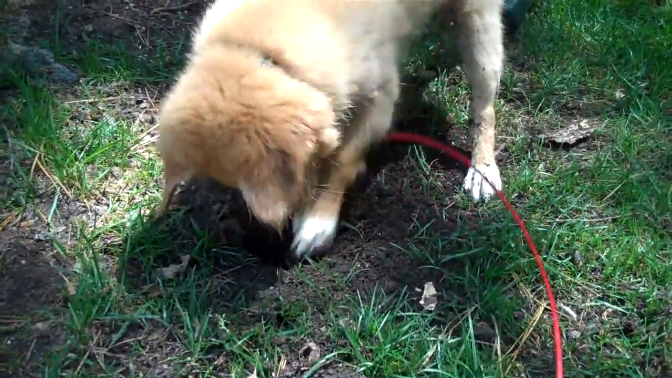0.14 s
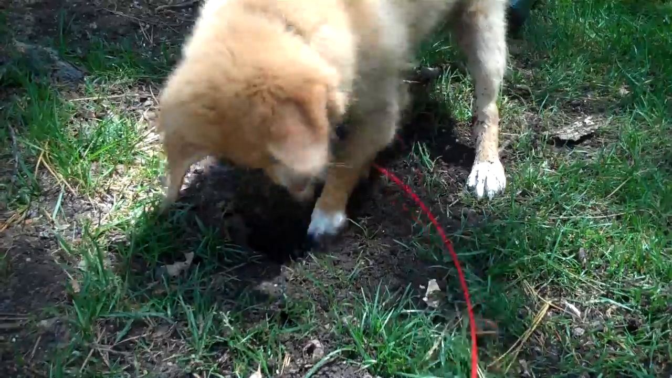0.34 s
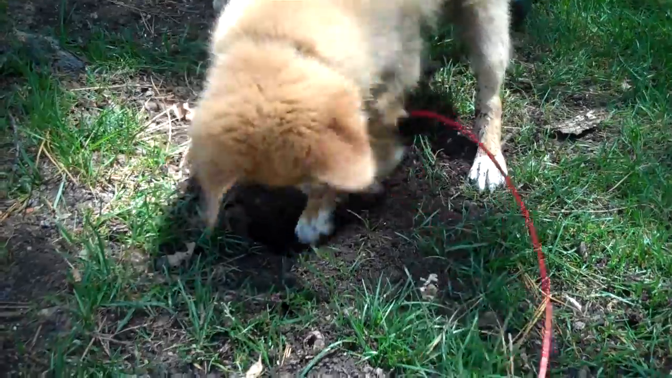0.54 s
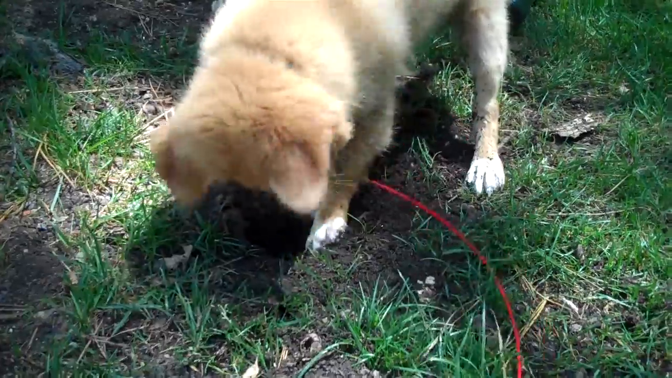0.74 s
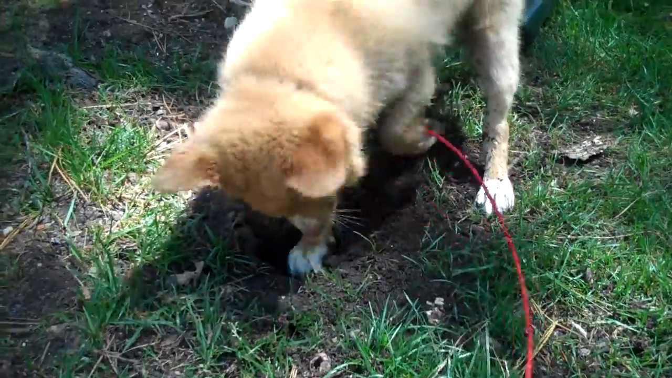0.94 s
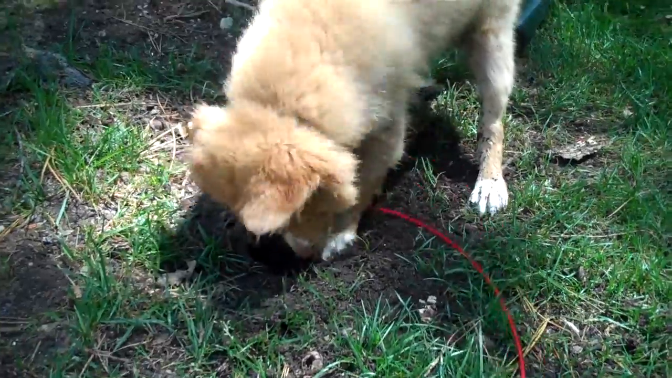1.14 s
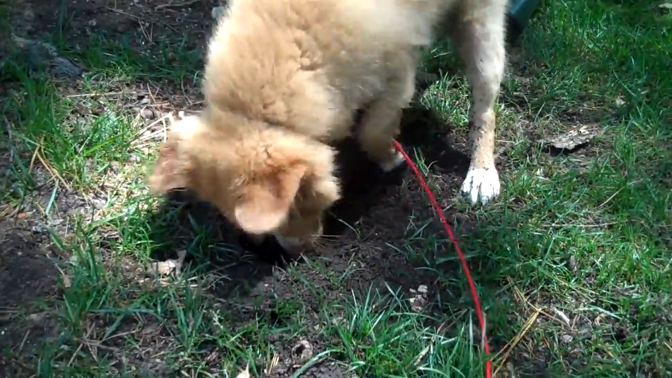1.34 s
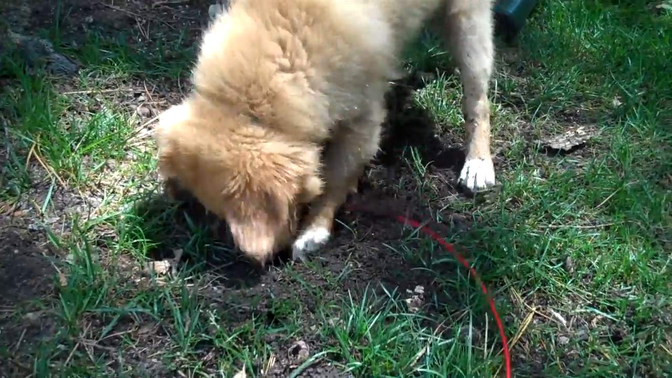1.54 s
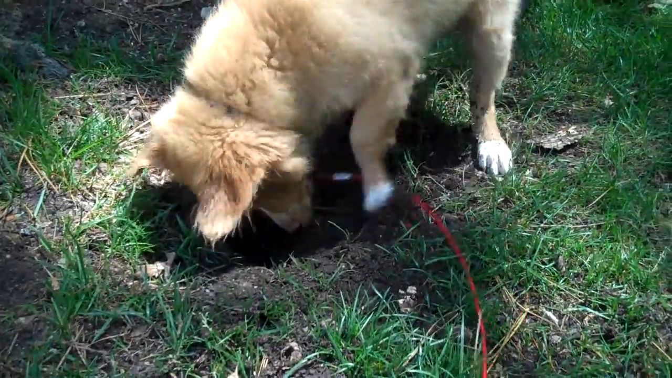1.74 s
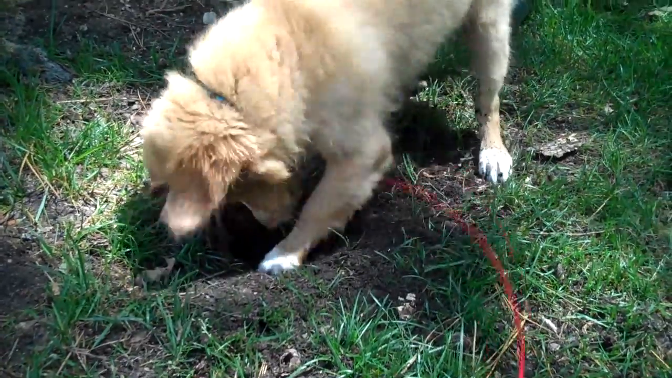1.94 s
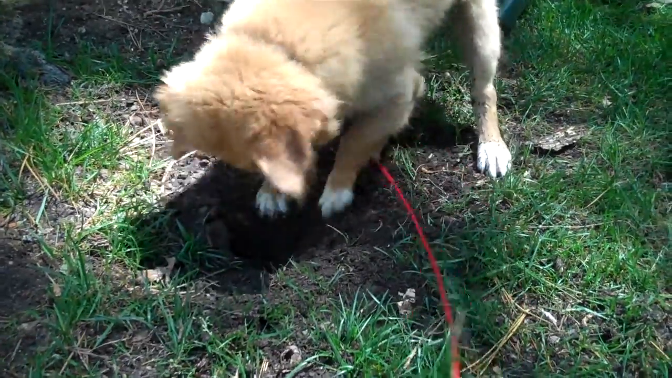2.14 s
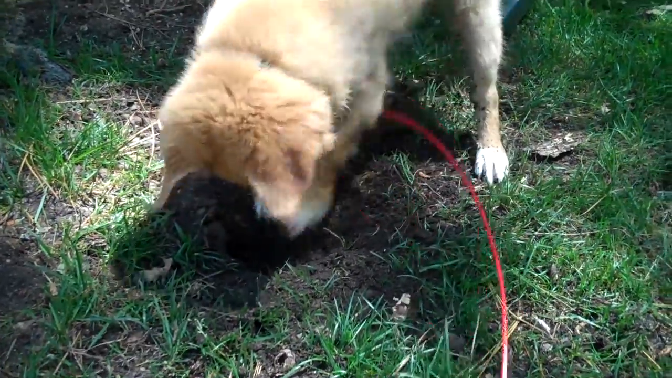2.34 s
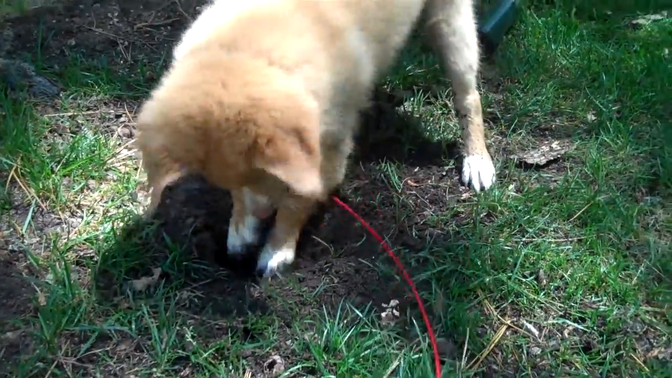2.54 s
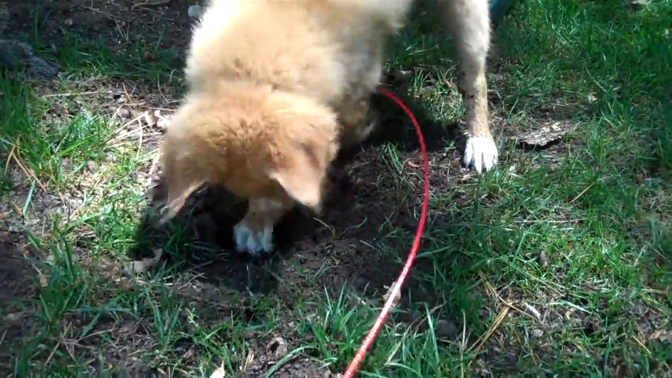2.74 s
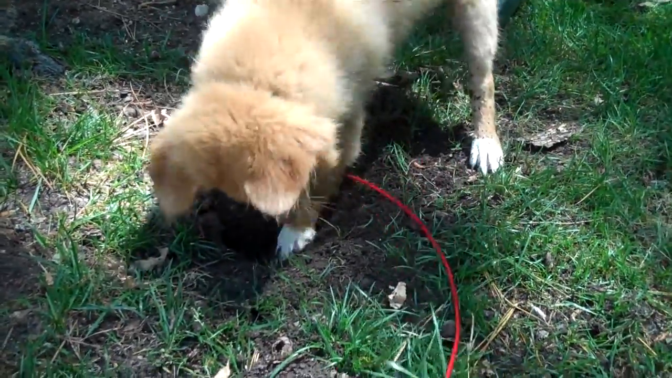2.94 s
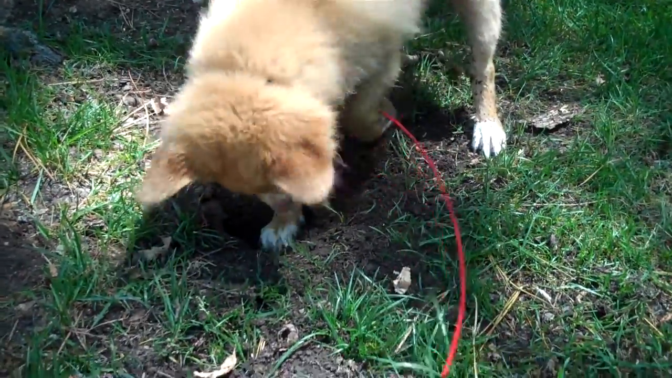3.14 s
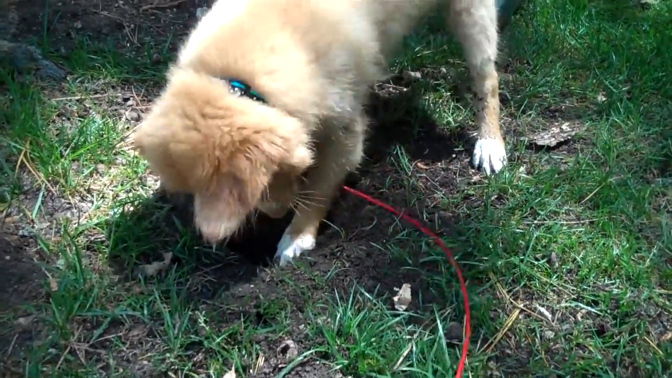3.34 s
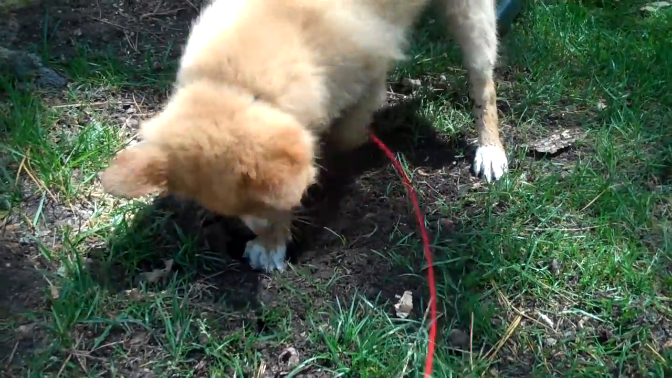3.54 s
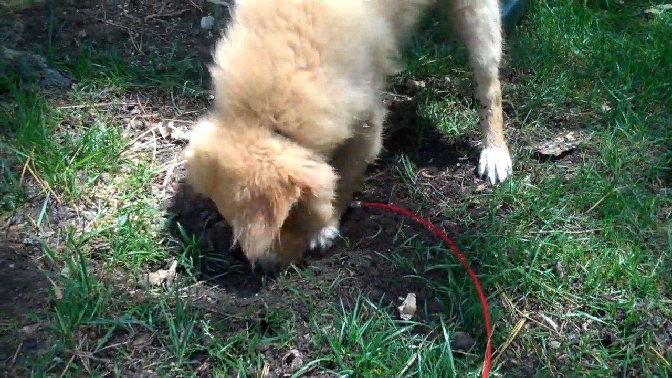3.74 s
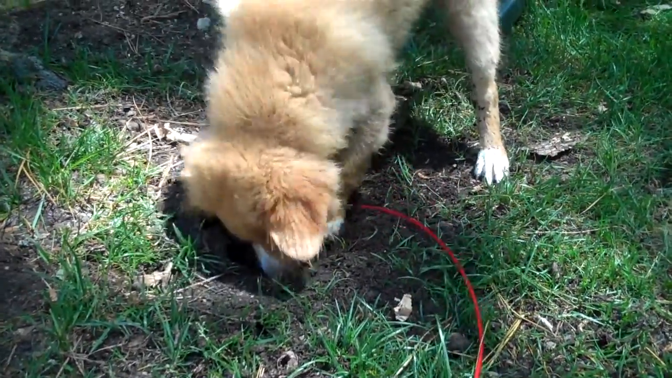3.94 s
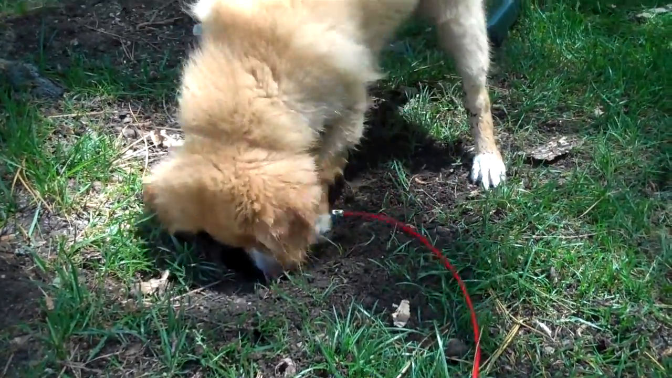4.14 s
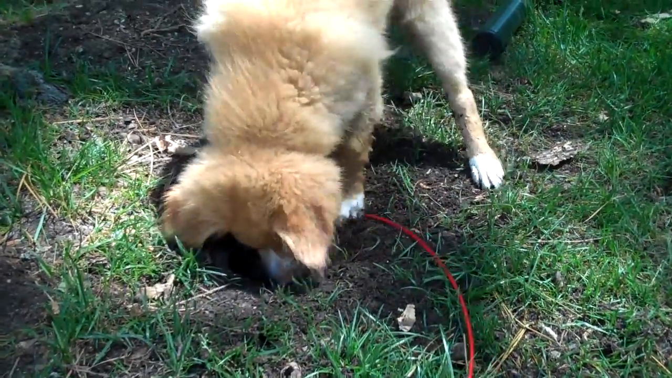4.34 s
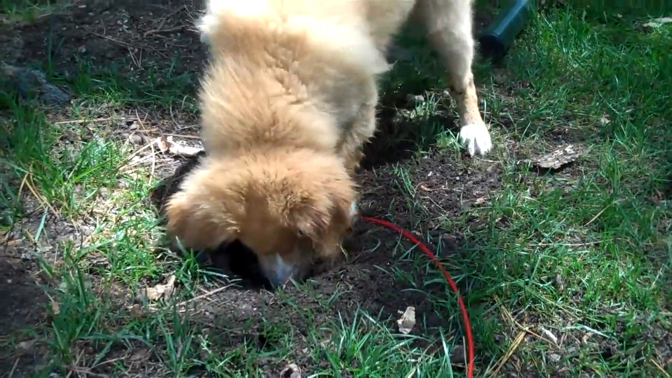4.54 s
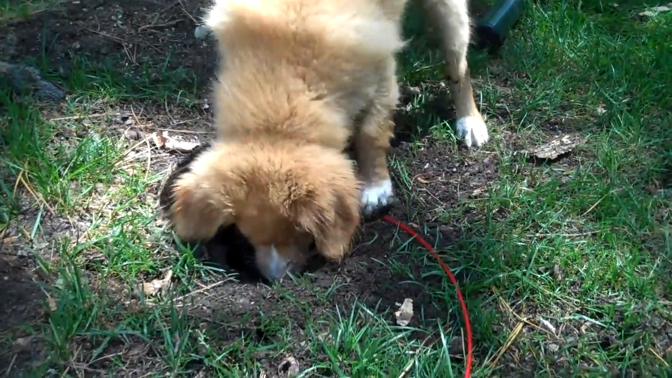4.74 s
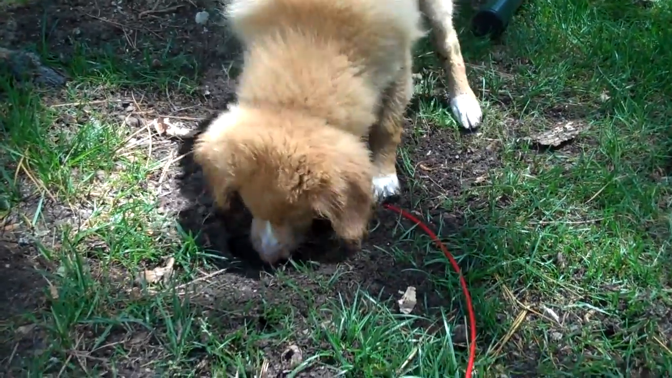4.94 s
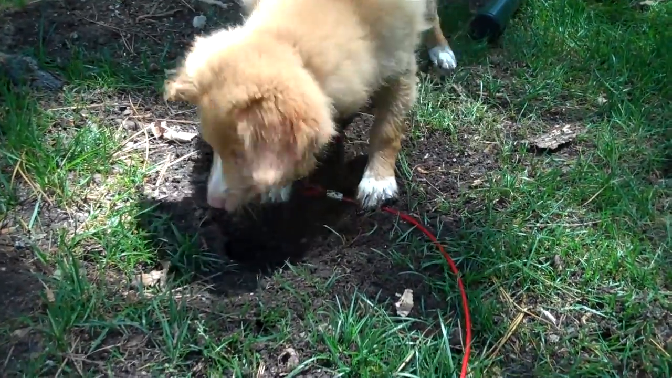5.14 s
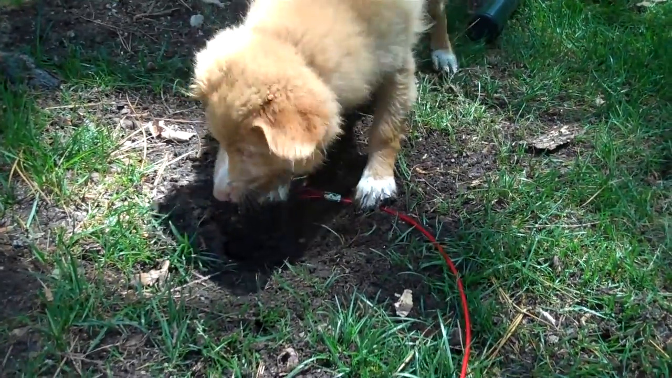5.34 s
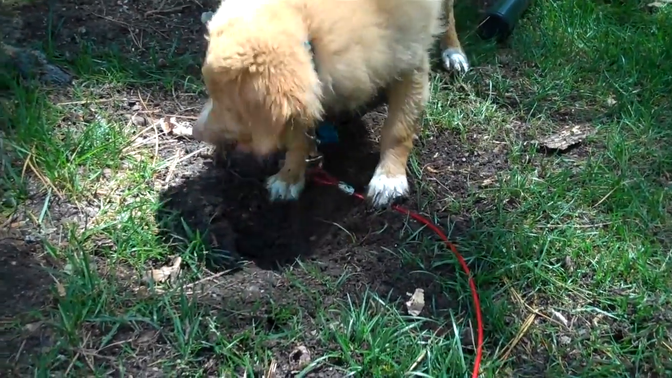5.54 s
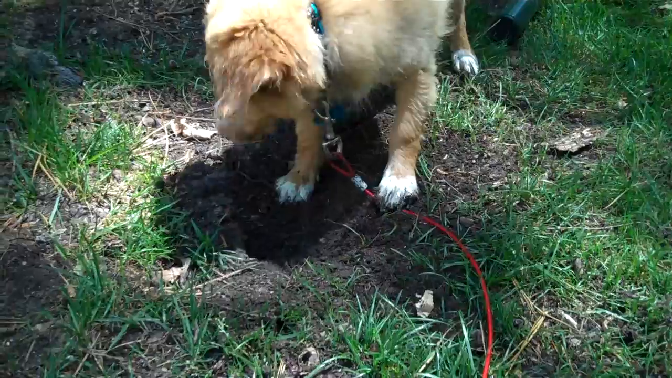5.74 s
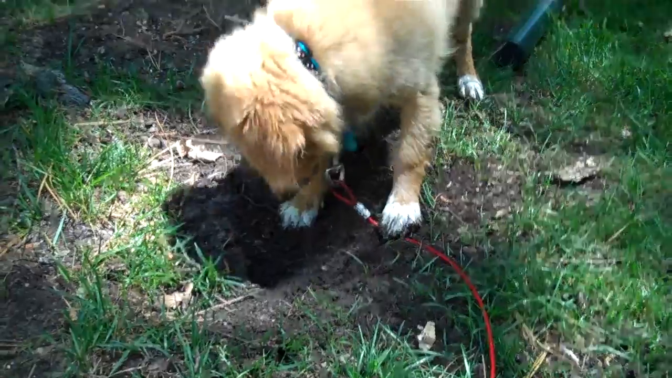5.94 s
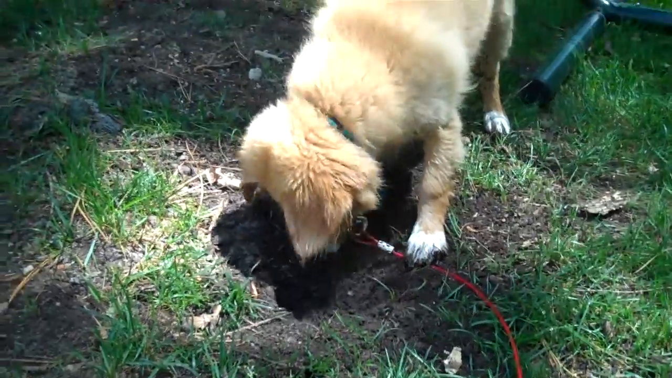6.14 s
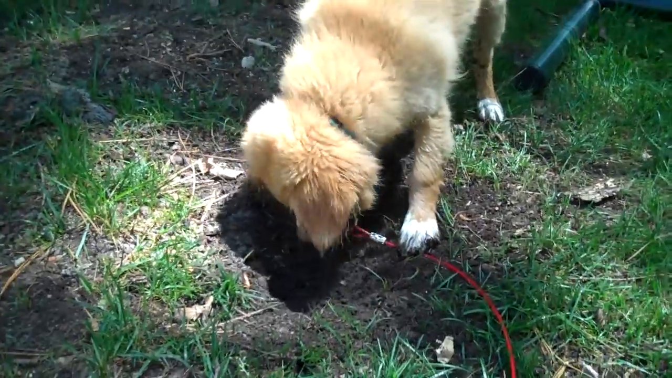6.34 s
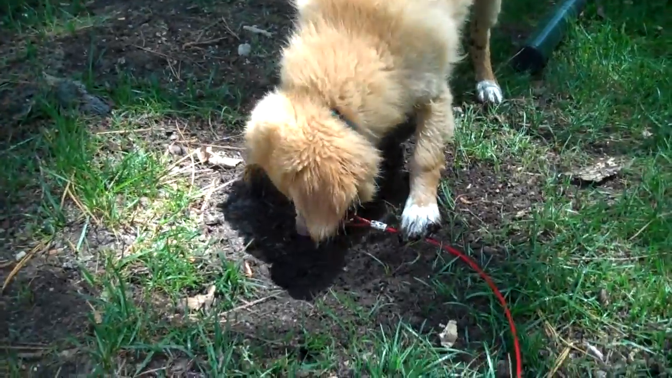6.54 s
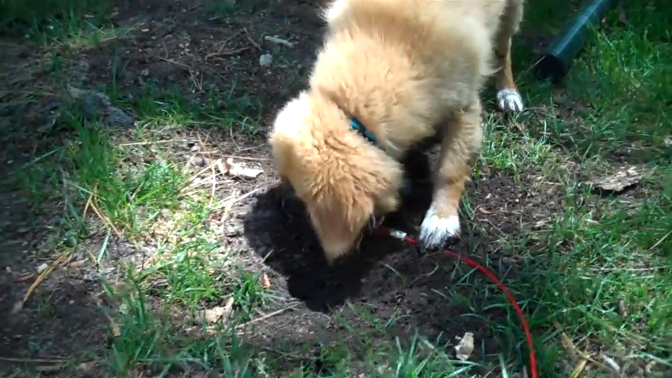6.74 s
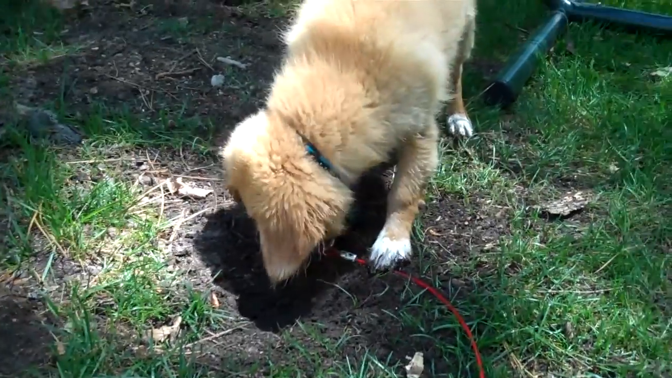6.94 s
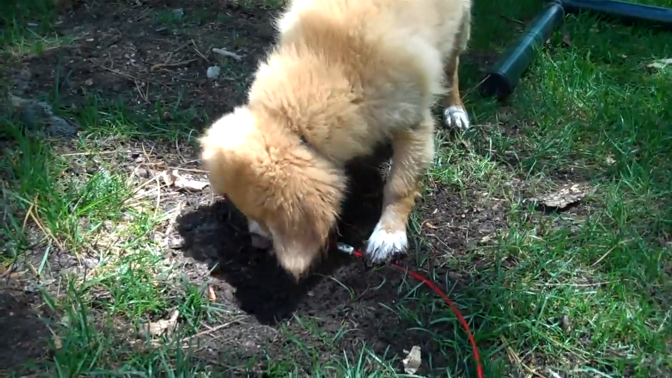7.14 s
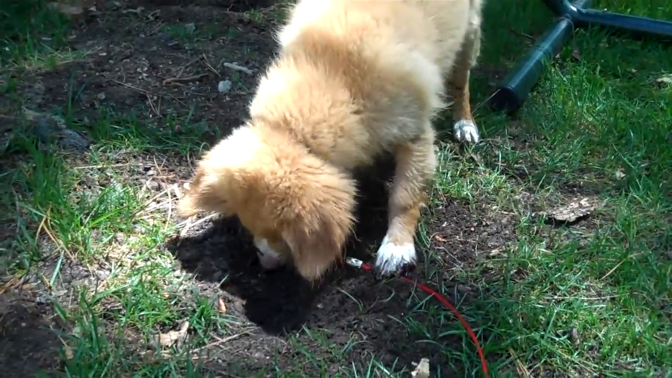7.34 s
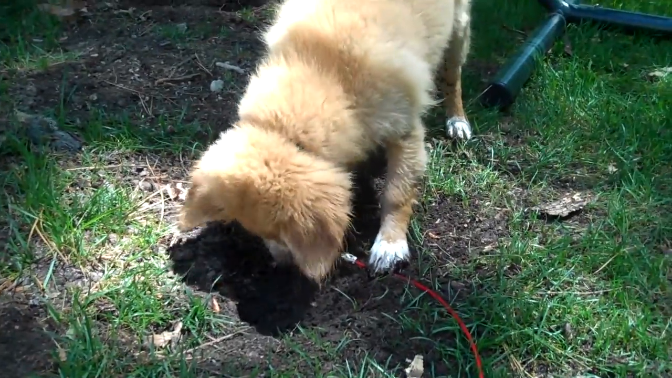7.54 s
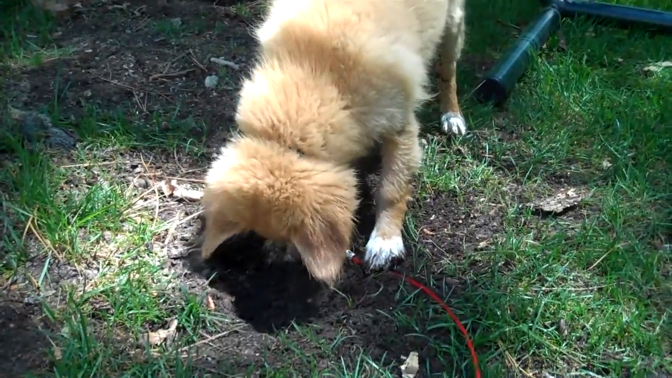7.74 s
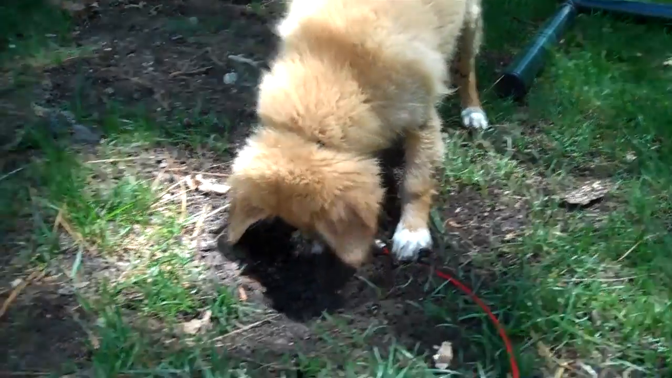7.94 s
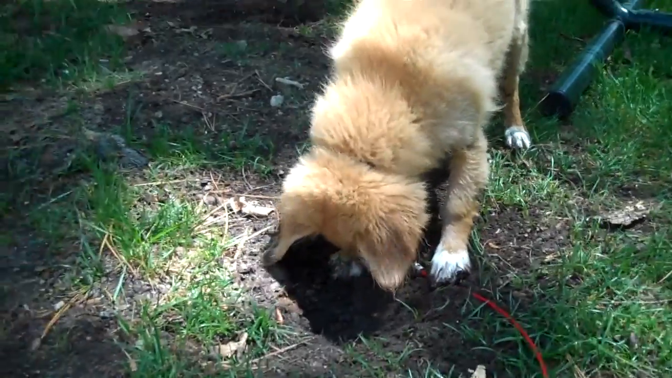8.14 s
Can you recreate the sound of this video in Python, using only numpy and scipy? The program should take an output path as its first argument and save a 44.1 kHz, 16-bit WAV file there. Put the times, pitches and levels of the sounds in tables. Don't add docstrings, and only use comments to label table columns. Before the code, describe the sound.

Outdoors in a yard, a small camera about a metre away hears a puppy digging busily: sharp claw clicks, root snaps, crumbling clods and bursts of sprayed dry earth, with collar tags clinking brightly. After four seconds the digging thins, a brief nose puff comes, a few more scratches follow, then mostly quiet town wash, low hum and a thin insect buzz.

```python
import sys
import numpy as np
from scipy import signal
from scipy.fft import rfft, irfft, next_fast_len
from scipy.io import wavfile
from scipy.ndimage import uniform_filter1d

SR = 44100
rng = np.random.default_rng(int(sys.argv[2]) if len(sys.argv) > 2 else 0)


def boost_factor(decibels):
    exponent = np.asarray(decibels, float) / 20
    return 10 ** exponent


def unload_audio(sound):
    columns = np.transpose(np.atleast_2d(sound))
    steps = np.round(np.clip(columns, -1, 1) * 32767)
    wavfile.write(sys.argv[1], SR, steps.astype(np.int16))


N = 365588
T = np.arange(N) / SR
OPPOSITE = np.array([[1], [-1]])


def level(x, rms_db):
    return x * boost_factor(rms_db) / np.sqrt(np.mean(x ** 2))


def peak(x, hz, width_hz):
    return signal.lfilter(*signal.iirpeak(hz, hz / width_hz, SR), x)


def band(x, lo_hz, hi_hz):
    return signal.sosfilt(signal.butter(2, [lo_hz, hi_hz], "band", fs=SR, output="sos"), x)


def low(x, hz, order):
    return signal.sosfilt(signal.butter(order, hz, fs=SR, output="sos"), x)


def sides(pan_db):
    gains = boost_factor(np.array([pan_db, -pan_db]) / 2)
    return 2 * gains / gains.sum(axis=0)


def quieter_right(pan_db):
    return boost_factor(np.array([[0], [-pan_db]]))


def late_left(x, samples):
    return np.array([np.roll(x[0], samples), x[1]])


def walk(rate_hz):
    hold = int(SR / rate_hz)
    steps = np.repeat(rng.standard_normal(N // hold + 1), hold)
    return 1.35 * uniform_filter1d(uniform_filter1d(steps, hold), hold)[:N]


def curve(tables, column, rest):
    out = np.full(N, float(rest))
    for rows in map(np.array, tables):
        inside = (T >= rows[0, 0]) & (T <= rows[-1, 0])
        out[inside] = np.interp(T[inside], rows[:, 0], rows[:, column])
    return out


def add(out, start_s, sound):
    i = int(start_s * SR)
    out[..., i:i + sound.shape[-1]] += sound[..., :N - i]


def narrow(hz, width_hz, steady):
    wobble = walk(width_hz) + 1j * walk(width_hz) + steady
    return np.real(wobble * np.exp(2j * np.pi * np.cumsum(hz + 0 * T) / SR))


# pitch_hz, width_hz, level_db
LEFT_PORT = [(7600, 1050, 1.6), (5200, 3600, -11)]
RIGHT_PORT = [(6330, 850, 3.0), (4400, 3000, -12)]


def ports(x):
    rung = []
    for heard, modes in zip(x, (LEFT_PORT, RIGHT_PORT)):
        rung.append(sum(boost_factor(db) * peak(heard, hz, width_hz) for hz, width_hz, db in modes))
    return band(np.array(rung), 2600, 9100)


# start_s, peak_db, left_minus_right_db
GRIT_TICKS = [(.0635, -14, 0), (.0667, -20, 3), (.1333, -29, -3), (.2035, -30, 0), (.2125, -34, -3),
              (.3674, -25, 9), (.5585, -16, -6), (.7255, -26, 2), (1.2275, -23, -3), (1.2979, -17, 3),
              (1.8393, -24, -4), (2.0842, -13, -4), (2.2471, -16, -1), (2.347, -19, 0), (3.0447, -19, 3),
              (3.0522, -9, 1), (3.1625, -21, -1), (3.612, -21, 0), (3.6551, -12, -3), (3.9098, -18, 9),
              (3.9196, -20, -1), (5.7079, -20, -1), (2.1635, -23, 0), (4.4235, -36, -4), (4.478, -36, 0),
              (6.992, -47, 5), (7.187, -46, 0)]
GRIT_CRACKS = [(.1277, -27, -5), (.9462, -22, -3), (1.3061, -22, 0), (1.3162, -16, -5), (1.4062, -14, -3),
               (1.4667, -28, -5), (1.4799, -24, 1), (1.857, -26, -1), (1.9657, -15, -6), (2.0376, -16, -4),
               (2.0712, -26, -9), (2.1744, -18, 0), (2.8453, -23, -1), (3.0077, -28, -3), (3.0359, -21, 4),
               (3.1591, -27, -3), (3.2117, -19, -3), (3.4208, -22, 1), (3.4606, -8, -3), (3.9332, -26, 0),
               (3.9378, -20, 5), (4.1341, -26, -1), (5.3366, -24, 6), (5.5086, -23, 8), (5.6803, -32, 8),
               (7.5143, -37, 5)]
CLOD_BREAKS = [(.3976, -30, -3), (.8254, -19, -1), (.9138, -29, 1), (1.0139, -22, -1), (1.6553, -33, -11),
               (1.7172, -27, -2), (1.7377, -29, 0), (1.9135, -24, 0), (2.2021, -29, 2), (2.2318, -22, -5),
               (2.6379, -23, -5), (2.6651, -28, -2), (2.7225, -21, 0), (2.7697, -20, 4), (3.2217, -21, 1),
               (3.6233, -20, 4), (3.6503, -22, -5), (3.8708, -29, 2), (4.1664, -30, -3), (4.5225, -33, -1),
               (5.5273, -19, 6), (5.6762, -27, 0), (5.7196, -27, -6), (5.7582, -38, -4), (5.9365, -33, 2),
               (7.1627, -39, 4)]
ROOT_TEARS = [(.2974, -20, 6), (.5146, -21, 5), (.5476, -16, 3), (.8354, -17, 3), (.8618, -9, -6),
              (1.1609, -19, -7), (1.3747, -23, -4), (1.4175, -15, 4), (2.318, -24, 0), (2.5851, -20, -7),
              (2.7266, -12, -4), (2.9781, -27, 0), (3.2898, -35, 1), (3.3993, -19, -7), (3.6161, -22, 1),
              (3.8268, -31, -4), (3.8429, -30, -5), (4.1936, -30, -5), (4.2684, -26, 3), (4.3242, -35, -3),
              (4.4452, -37, -4), (4.647, -40, -1), (4.7085, -32, 1), (4.7503, -35, 0), (5.113, -29, -5),
              (5.3709, -34, -4), (6.2623, -38, -6), (7.3272, -44, -3), (7.6608, -39, -6), (7.965, -45, -7)]


def snaps():
    body, dull = np.zeros((2, 2, N))
    t = np.arange(900) / SR
    crumbling = np.exp(-t / .0008) + .12 * np.exp(-t / .007)
    kinds = (GRIT_TICKS, -29), (GRIT_CRACKS, -23), (CLOD_BREAKS, -17), (ROOT_TEARS, -11)
    for rows, dull_db in kinds:
        for start_s, peak_db, pan_db in rows:
            mid, side = rng.standard_normal((2, len(t)))
            burst = .34 * (mid + .46 * side * OPPOSITE) * crumbling
            burst[:, 0] += 1
            burst = burst * boost_factor(peak_db)
            add(body, start_s, burst * sides(pan_db)[:, None])
            add(dull, start_s, burst * boost_factor(dull_db))
    ringing = band(ports(body), 3900, 15000)
    dull = band(dull, 1900, 5200)
    sharp = low(band(body, 9300, 15000), 14300, order=12) * sides(10.5)[:, None]
    return boost_factor(18.5) * ringing + boost_factor(21) * dull + boost_factor(-8) * sharp


# fullest_s, level_db, swell_over_18db_s, fall_by_18db_s
PAW_STROKES = [(.073, -37, .15, .12), (.33, -46, .16, .4), (.556, -36, .19, .06), (.869, -43, .3, .075),
               (.967, -38, .06, .12), (1.161, -45, .13, .6), (1.307, -35, .087, .045),
               (1.426, -38, .1, .14), (1.731, -48, .1, .4), (1.923, -38, .13, .3), (2.087, -44, .2, .12),
               (2.167, -41, .08, .06), (2.24, -39, .06, .12), (2.346, -43, .6, .16), (2.598, -37, .07, .11),
               (2.758, -38, .09, .08), (2.949, -45, .3, .4), (3.053, -38, .06, .08),
               (3.225, -36, .12, .035), (3.455, -36, .14, .05), (3.645, -41, .21, .05),
               (3.928, -43, .195, .06), (4.185, -52, .25, .09), (4.441, -56, .32, 1.1),
               (4.858, -50, .06, .16), (5.175, -41, .1, .12), (5.523, -47, .045, .035),
               (5.671, -56, .2, .3), (5.94, -55, .07, .07)]
# start_s, level_db
SETTLING = [
    (0, -58),
    (3.9, -59),
    (4.1, -66),
    (5.4, -62),
    (6.0, -80),
    (8.29, -80),
]


def digging():
    out = curve([SETTLING], 1, -120)
    for full_s, db, swell_s, fall_s in PAW_STROKES:
        before = (full_s - T) / max(swell_s, .01)
        after = (T - full_s) / max(fall_s, .01)
        out = np.maximum(out, db - 18 * np.maximum(before, after))
    return out


def grit(per_second, scatter_db, smooth):
    size = boost_factor(scatter_db * np.minimum(rng.exponential(size=(2, N)), 3.5))
    size = size * (rng.random((2, N)) < per_second / SR)
    grains = level(size * rng.uniform(-1, 1, (2, N)), 0) + smooth * rng.standard_normal((2, N))
    return grains[0] + .4 * grains[1] * OPPOSITE


# pitch_hz, ring_time_share, left_minus_right_db, longest_ring_s
FIRST_TAG = (10085, 1.05, 12, .1)
SECOND_TAG = (11560, 1.15, 15, .1)


def soil():
    drag_ref_db, drag_slope, spray_ref_db = -52, .48, -42
    scuff_s, scuff_db, scuff_db_per_s = 8.255, -54, 200
    grains = grit(2200., scatter_db=3.8, smooth=.5) * boost_factor(3.8 * walk(60))
    other = grit(900., scatter_db=3.0, smooth=.8)
    fine = level(band(grains, 10800, 15500), -20) * sides(7.5)[:, None]
    bright = level(ports(grains), 3.0) + fine
    dull = level(band(other + 1.3 * grains, 1050, 5200), 5.2)

    spray_db = digging()
    drag_db = drag_ref_db + drag_slope * (spray_db - spray_ref_db)

    jolts = (rng.random((2, N)) < 32 / SR) * rng.standard_normal((2, N))
    jingle = level(peak(jolts[0], FIRST_TAG[0], 50.), -16) + level(peak(jolts[1], SECOND_TAG[0], 50.), -19)
    jingle = jingle * quieter_right(FIRST_TAG[2])
    jingle = jingle * boost_factor(12 + 1.4 * (drag_db - drag_ref_db) + drag_ref_db)

    drag_db = np.maximum(drag_db, scuff_db - scuff_db_per_s * np.abs(T - scuff_s))
    return low(boost_factor(spray_db) * bright + boost_factor(drag_db) * dull + jingle, 14000, order=30)


def ring(hz, db, t60_s, length_s, blow_cycles=3.5):
    t = np.arange(int(min(length_s, t60_s) * SR) + 60) / SR
    choke = np.clip((t[-1] - t) / .0012, 0, 1)
    onset = np.minimum(t * hz / blow_cycles, 1)
    return boost_factor(db - 60 * t / t60_s) * choke * onset * np.sin(2 * np.pi * hz * t)


# pitch_hz, ring_time_share, left_minus_right_db, longest_ring_s
CLASP_MODE = (8186, 2.5, 9, .009)
LOWER_RING = (3270, 1.3, -1, .04)
HIGHER_RING = (3700, .9, -1, .022)
# start_s, left_peak_db, fall_by_16db_s
FIRST_TAG_BLOWS = [(.368, -44, .009), (.5477, -34, .019), (.8263, -42, .032), (.8352, -30, .014),
                   (1.2866, -44, .049), (1.298, -28, .029), (1.3166, -32, .009), (1.3752, -36, .017),
                   (1.4167, -27, .016), (1.4668, -42, .018), (1.6676, -44, .016), (1.7193, -27, .009),
                   (1.7311, -29, .022), (1.8392, -42, .013), (2.7562, -36, .009), (3.0369, -29, .04),
                   (3.0526, -22, .02), (3.1628, -42, .012), (3.221, -39, .011), (3.4602, -27, .02),
                   (3.9098, -39, .011), (3.9224, -43, .013), (4.1365, -37, .013), (4.1669, -46, .012),
                   (4.5229, -40, .02), (4.7502, -48, .02), (5.3371, -42, .029), (5.5275, -40, .018),
                   (7.311, -58, .02), (7.6615, -52, .019)]
# start_s, peak_db
SECOND_TAG_BLOWS = [(.0634, -39.5), (.8041, -50), (.8352, -37), (.8729, -46), (1.3166, -37), (1.3752, -46),
                    (1.4668, -47), (1.4942, -45), (1.9662, -49), (2.7562, -35), (3.0526, -45),
                    (3.1628, -49), (3.2119, -35), (3.9098, -31), (3.9224, -45), (3.9386, -41),
                    (4.2031, -50), (4.3524, -51), (4.5229, -49), (4.7502, -48), (5.2993, -47),
                    (5.3371, -42), (5.3702, -44), (5.5091, -43), (5.6765, -51), (5.7079, -32), (5.933, -55),
                    (6.115, -57), (7.1629, -50), (7.514, -58)]
CLASP_HITS = [(.368, -38), (.8263, -28), (1.298, -26), (1.3166, -35), (1.4167, -31), (2.7562, -27),
              (3.0369, -32), (3.0526, -25), (3.1628, -39), (3.9098, -30), (3.9224, -38), (4.1365, -36),
              (5.5091, -25), (5.5275, -24)]
LOWER_RING_BLOWS = [
    (1.298, -48),
    (3.0369, -48),
    (3.0526, -44),
    (3.4602, -41),
    (4.5229, -55),
    (5.7079, -52),
]
HIGHER_RING_BLOWS = [(1.16, -41), (1.3166, -44), (1.3752, -55), (1.4167, -45), (1.7193, -46), (2.7562, -36),
                     (5.3702, -44), (5.5091, -46), (5.5275, -44), (5.6765, -50), (5.7079, -47),
                     (5.933, -56)]
# start_s, pitch_hz, level_db, t60_s
STRUCK_STONES = [
    (.866, 2915, -43, .4),
    (.864, 790, -46, .1),
    (.8618, 1600, -13, .011),
    (.8618, 2850, -10, .009),
    (.8618, 4400, -15, .006),
    (2.726, 2100, -32, .012),
    (5.932, 6050, -36, .03),
    (6.262, 1650, -42, .01),
]


def collar():
    shake_db = -10

    def timed(rows, fall_s):
        return [(start_s, db, fall_s) for start_s, db in rows]

    second = timed(SECOND_TAG_BLOWS, .013)
    # mode, blows, lift_db
    parts = ((FIRST_TAG, FIRST_TAG_BLOWS, 8.5),
             (SECOND_TAG, second, 10.5),
             (FIRST_TAG, second, shake_db + 7),
             (SECOND_TAG, FIRST_TAG_BLOWS, shake_db + 4),
             (CLASP_MODE, timed(CLASP_HITS, .016), 6),
             (LOWER_RING, timed(LOWER_RING_BLOWS, .022), 4),
             (HIGHER_RING, timed(HIGHER_RING_BLOWS, .016), 5))
    contacts_s = np.sort([row[0] for _, rows, _ in parts for row in rows] + [N])
    out = np.zeros((2, N))
    for (hz, share, pan_db, free_s), rows, lift_db in parts:
        for start_s, db, fall_s in rows:
            detune = 1 + .0015 * rng.standard_normal()
            gap_s = contacts_s[contacts_s > start_s + .005][0] - start_s
            t60_s = share * max(fall_s, .003) * 60 / 16
            tone = ring(hz * detune, db + lift_db, t60_s, min(gap_s, free_s))
            add(out, start_s, quieter_right(pan_db) * tone)
    for start_s, hz, db, t60_s in STRUCK_STONES:
        add(out, start_s, ring(hz, db, t60_s, .075, blow_cycles=.4))
    return band(out, 900, 14500)


# start_s, pitch_hz, level_db
NOSE_PUFF = [
    (5.11, 2600, -70),
    (5.18, 2450, -53),
    (5.215, 2100, -50),
    (5.26, 1500, -65),
]


def snort():
    return boost_factor(curve([NOSE_PUFF], 2, -120)) * narrow(curve([NOSE_PUFF], 1, 2000), 800., .1)


# start_s, level_db, pitch_hz
INSECT_CALLS = [
    [(6.68, -71, 7620), (6.9, -61, 7620), (7.1, -69, 7640)],
    [(7.74, -71, 7650), (8.018, -60.5, 7660), (8.1, -81, 7600)],
]


def insect():
    hz = curve(INSECT_CALLS, 2, 7000)
    buzz = narrow(hz, 700., .1) + boost_factor(-8) * narrow(1.09 * hz, 500., .1)
    return boost_factor(curve(INSECT_CALLS, 1, -120)) * buzz * sides(5.0)[:, None]


# pitch_hz, level_db, width_hz
HUM_LINES = [(216, -67.5, 6), (539, -66.5, 4), (119.2, -72.5, 12)]
# start_s, pitch_hz, level_db
FAR_WHINE = [
    (7.2, 1400, -72),
    (7.3, 1430, -62),
    (7.75, 1530, -61),
    (7.92, 1500, -72),
]
# start_s, level_db
LORRY_RUMBLE = [
    (0.0, -56.5),
    (4.39, -69.5),
    (8.17, -67),
    (8.29, -56),
]


def machines():
    hum = sum(boost_factor(db - 7.5) * narrow(hz, 1. * width_hz, 3.2) for hz, db, width_hz in HUM_LINES)
    whine = boost_factor(curve([FAR_WHINE], 2, -120) + 1.2) * narrow(curve([FAR_WHINE], 1, 1500), 330., .2)
    rumble = level(band(rng.standard_normal(N), 61, 152), -1.4)
    return hum + whine + boost_factor(curve([LORRY_RUMBLE], 1, -120)) * rumble


# pitch_hz, level_db_per_hz
TOWN_SPECTRUM = [(18, -48), (40, -17), (190, -13), (500, -11), (1060, -7.5), (1900, -12.5), (3000, -16),
                 (4900, -20), (6300, -15.5), (8000, -24), (9500, -28), (14150, -29), (14300, -70)]
# pitch_hz, likeness_0_to_1
TOWN_LIKENESS = [(60, 0.63), (130, 0.87), (290, 0.84), (640, 0.8), (1410, 0.61), (3100, 0), (6820, 0.19),
                 (15000, 0)]
# pitch_hz, left_minus_right_db
TOWN_LEAN = [(60, -6), (110, -3), (200, -0.5), (380, 0), (700, -1.0), (1290, -1.5), (2380, -2),
             (4400, -4.0), (8120, 3), (15000, -0.5)]


def town():
    size = next_fast_len(N)
    log_hz = np.log(np.arange(size // 2 + 1) * SR / size + 1)

    def read(table):
        hz, value = np.array(table).T
        return np.interp(log_hz, np.log(hz), value)

    alike = np.clip(read(TOWN_LIKENESS), 0, 1)
    mid, side = rfft(rng.standard_normal((2, size)))
    pair = np.sqrt(1 + alike) * mid + np.sqrt(1 - alike) * side * OPPOSITE
    pair = boost_factor(read(TOWN_SPECTRUM)) * sides(read(TOWN_LEAN)) * pair
    wash = irfft(pair, size)[:, :N]
    bass = low(wash, 900, order=2)
    treble = wash - bass
    return level(bass * boost_factor(.4 * walk(1.5)) + treble * boost_factor(.4 * walk(4.0)), -52.5)


def scene():
    near = late_left(snaps() + soil() + collar() + snort(), samples=1)
    return near + insect() + machines() + late_left(town(), samples=4)


def top_cut(x):
    return signal.sosfilt(signal.butter(12, 16480, fs=SR, output="sos"), x)


def record(dry):
    return top_cut(dry)


dry = scene()
out = record(dry)
unload_audio(out)
```